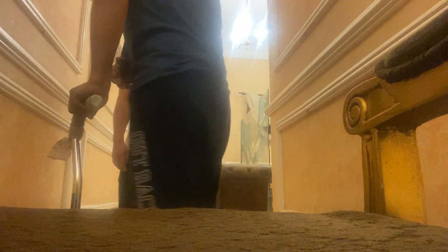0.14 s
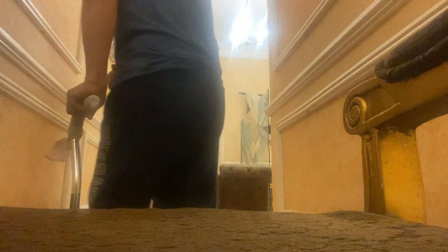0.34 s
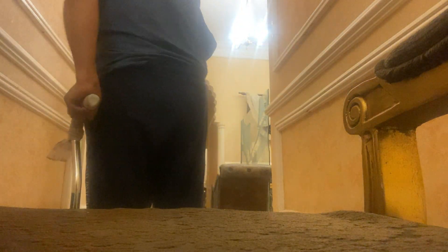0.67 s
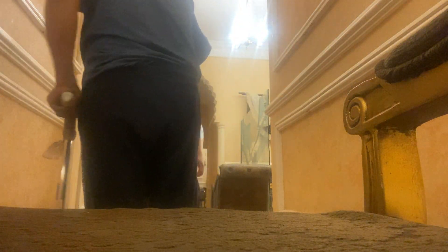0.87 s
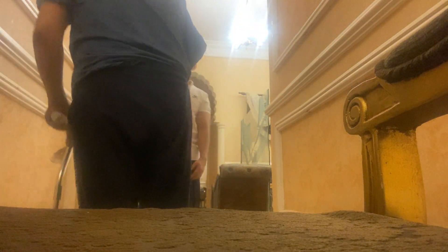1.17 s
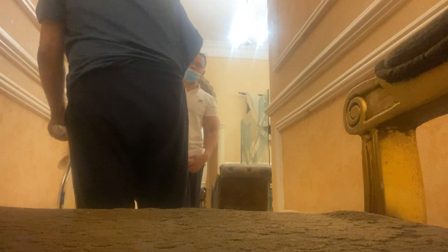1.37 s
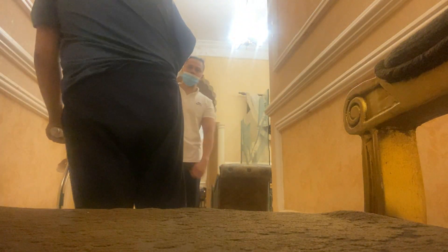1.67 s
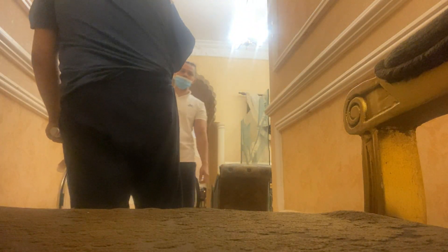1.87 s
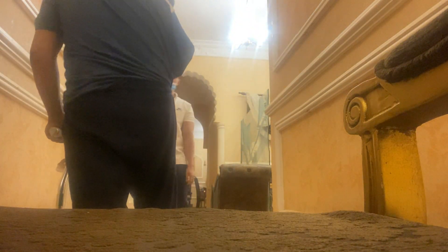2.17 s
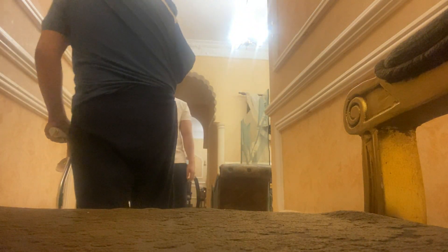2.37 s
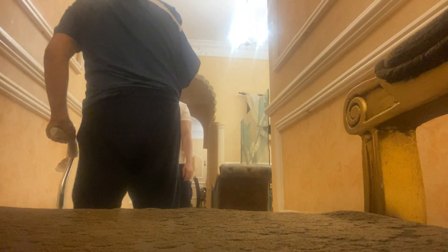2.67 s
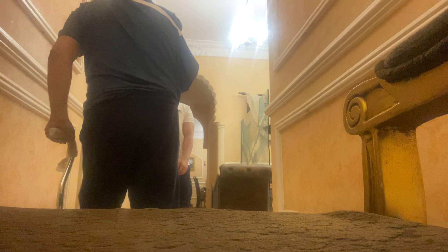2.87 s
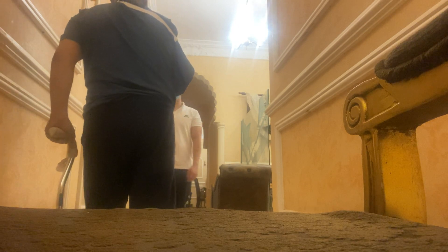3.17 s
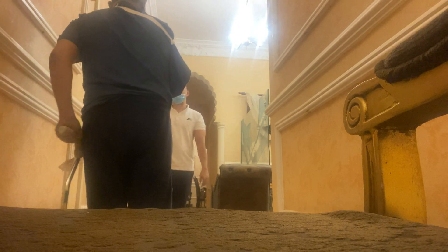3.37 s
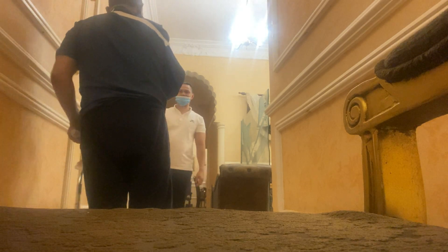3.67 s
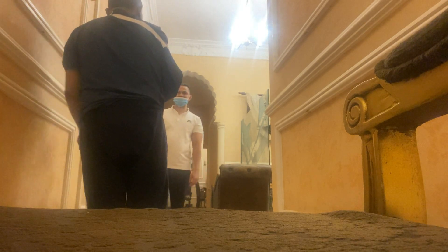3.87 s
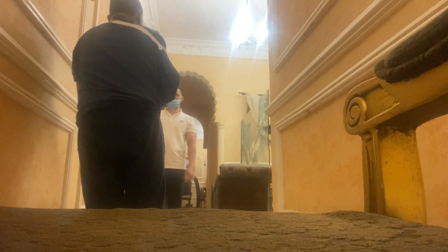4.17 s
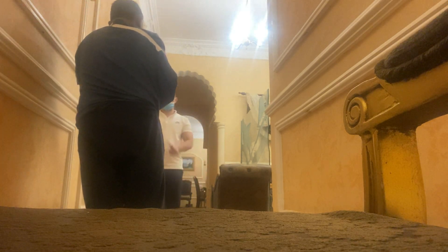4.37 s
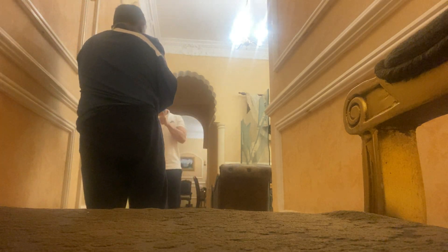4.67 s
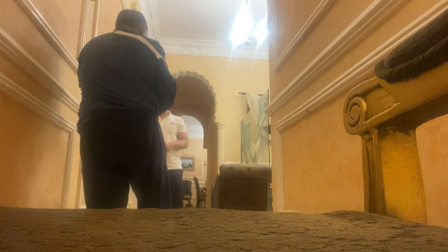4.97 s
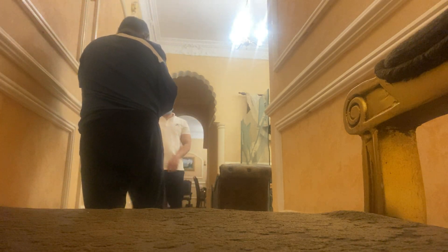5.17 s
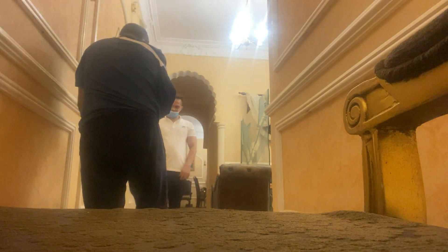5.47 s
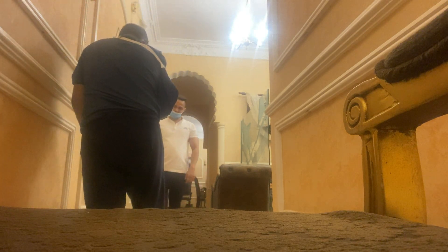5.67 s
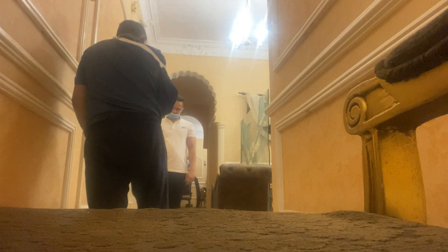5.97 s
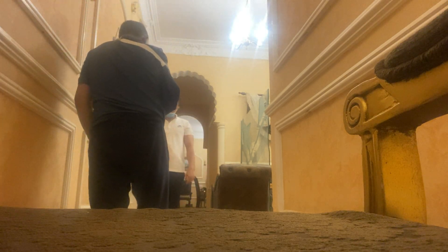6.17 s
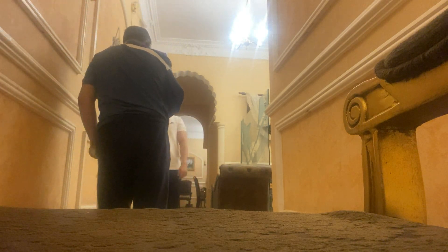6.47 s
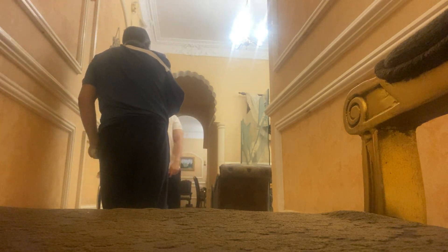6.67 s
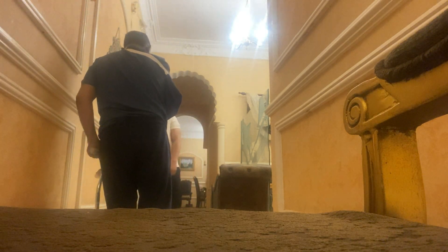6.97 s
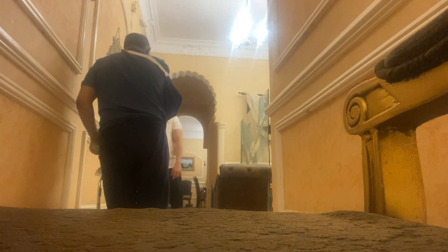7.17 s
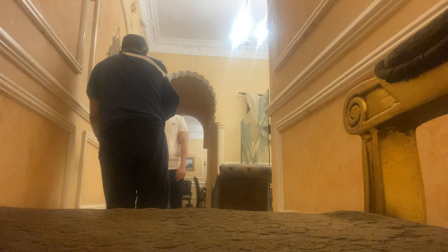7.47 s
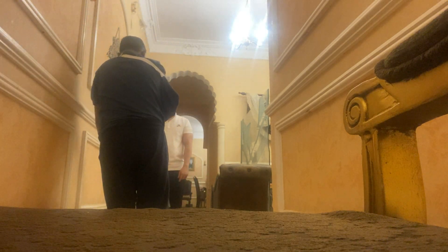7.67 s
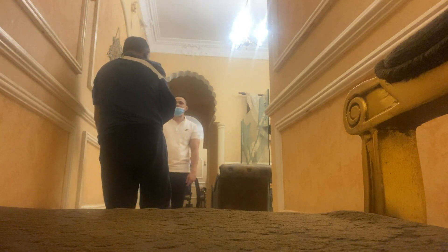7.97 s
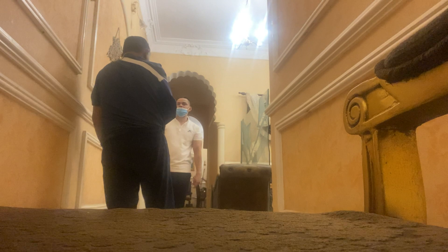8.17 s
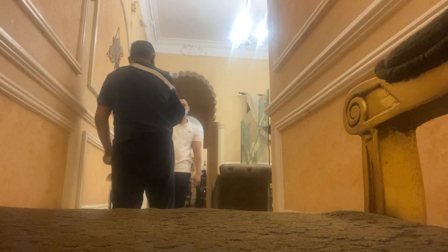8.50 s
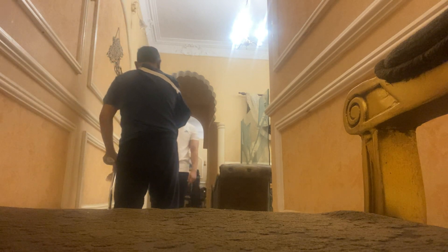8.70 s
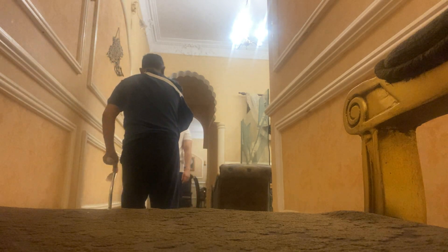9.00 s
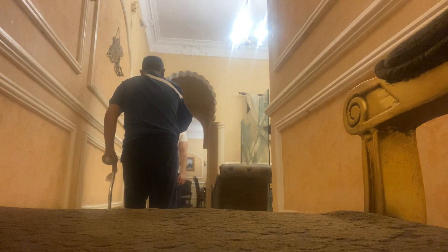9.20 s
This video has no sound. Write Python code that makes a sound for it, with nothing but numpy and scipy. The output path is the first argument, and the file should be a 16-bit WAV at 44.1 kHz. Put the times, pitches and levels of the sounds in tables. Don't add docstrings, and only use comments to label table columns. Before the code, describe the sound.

Slow shuffling steps and sparse cane taps recede along an echoing indoor corridor, beneath low throbbing motor drone and soft air hiss.

```python
import sys
import numpy as np
from scipy import signal
from scipy.fft import rfft, irfft, next_fast_len
from scipy.io import wavfile
from scipy.ndimage import map_coordinates

SR = 44100
rng = np.random.default_rng(int(sys.argv[2]) if len(sys.argv) > 2 else 0)


def gain_from_decibels(decibels):
    exponent = np.asarray(decibels, float) / 20
    return 10 ** exponent


def output_pcm(signal):
    pcm = np.clip(np.atleast_2d(signal).T, -1, 1) * 32767
    wavfile.write(sys.argv[1], SR, np.round(pcm).astype(np.int16))


N = 411894
LEAD = 9


def unit(x):
    return x / np.sqrt(np.mean(x ** 2) + 1e-20)


def along(points, hz):
    f, value = np.transpose(points)
    return np.interp(np.log(hz + 1), np.log(f + 1), value)


def wobble(rate):
    knots = rng.standard_normal(int(N * rate / SR) + 4)
    return map_coordinates(knots, [np.arange(N) * rate / SR])


def filtered(x, response):
    m = next_fast_len(N + SR // 2)
    return irfft(rfft(x, m) * response(np.fft.rfftfreq(m, 1 / SR)), m)[..., :N]


def band(x, lo_hz, hi_hz):
    return signal.sosfilt(signal.butter(2, [lo_hz, hi_hz], "band", fs=SR, output="sos"), x)


# (frequency [Hz], level [dB rms])
LEADING_MOTORS = [(57.168, -34), (116.047, -48.5)]
# (slip [Hz], level under the leader
# [dB], time both are in step [s])
SLIPS_LOW = [(.195, -5.7, 5.408), (.769, -9.1, 4.33), (.952, -7.6, 4.829), (1.912, -12.1, 4.377),
             (-1.921, -23.5, 4.847)]
SLIPS_HIGH = [(-1.707, -17.8, 4.837), (-1.326, -15.1, 4.757), (-1.066, -9.5, 4.138), (1.106, -9.8, 4.431),
              (2.127, -6.7, 4.772), (4.001, -2.5, 4.475)]


def beating_motors():
    t = np.arange(N) / SR
    drone = np.zeros(N)
    for (hz, db), slips in zip(LEADING_MOTORS, (SLIPS_LOW, SLIPS_HIGH)):
        group = np.cos(2 * np.pi * hz * t)
        for slip_hz, under_db, in_step_s in slips:
            group += gain_from_decibels(under_db) * np.cos(2 * np.pi * (hz * t + slip_hz * (t - in_step_s)))
        drone += np.sqrt(2) * gain_from_decibels(db) * group
    return drone


# (frequency [Hz], level [dB rms])
HUM_TONES = [(69.0, -47), (78.59, -52), (157.17, -62), (180.25, -50), (232.07, -65), (234.31, -63),
             (239.99, -57), (409.8, -64)]


def steady_hum():
    t = np.arange(N) / SR
    hum = np.zeros(N)
    for hz, db in HUM_TONES:
        drift = 2 * np.pi * rng.random() + 0.32 * wobble(1.2)
        level = np.sqrt(2) * gain_from_decibels(db + 0.19 * wobble(0.83))
        hum += level * np.sin(2 * np.pi * hz * t + drift)
    return hum


# (frequency [Hz], width [Hz], boost [dB])
DUCT_MODES = [(77, 1.2, 9.5), (87.3, 4.4, 9.5), (158.6, 5, 6.5), (173.5, 12, 6.5), (178, 120, 4),
              (284.8, 19.4, 9.5), (345, 46, 5.5), (420, 16, 9), (484.6, 15, 6.5), (771, 49, 4.5)]
# (frequency [Hz], level [dB per Hz])
RUMBLE_SHARED = [(25, -42), (40, -40.5), (50, -28.5), (62, -19.5), (95, -27), (105, -31.5), (135, -35.5),
                 (200, -36.5), (300, -37.5), (450, -38.5), (550, -42), (800, -47.5), (950, -55),
                 (1300, -100)]
# (frequency [Hz], level [dB per Hz])
RUMBLE_OPPOSED = [(15, -60), (25, -24), (44, -9), (65, -10.5), (92, -15.5), (162, -5.5), (205, -9.5),
                  (229, -9.5), (363, -15.5), (419, -7), (1100, -17.5), (1430, -47.5), (2420, -120)]
# (frequency [Hz], level [dB per Hz])
GRILLE_HISS = [(700, -32.5), (1000, 4.5), (1500, -2), (2000, -4.5), (2700, -7), (3100, -12.5),
               (4500, -17.5), (5500, -23.5), (8000, -33), (9500, -33.5), (12000, -29.5), (15000, -30.5)]


def duct_air():
    def ducts(f):
        return 1 + sum((gain_from_decibels(db) - 1) / (1 + (2 * (f - hz) / width) ** 2) for hz, width, db in DUCT_MODES)

    mid = filtered(rng.standard_normal(N), lambda f: gain_from_decibels(along(RUMBLE_SHARED, f) + 4.5) * ducts(f))
    side = filtered(rng.standard_normal(N), lambda f: gain_from_decibels(along(RUMBLE_OPPOSED, f) - 26) * ducts(f))
    hiss = filtered(rng.standard_normal((2, N)), lambda f: gain_from_decibels(along(GRILLE_HISS, f) - 53.5))
    hiss *= gain_from_decibels(0.5 * wobble(1.5) + 1.0 * wobble(9))
    mid = mid + hiss[0]
    side = side + gain_from_decibels(0.2) * hiss[1]
    swell = gain_from_decibels(0.6 * wobble(2.69))
    return swell * np.array([mid + side, mid - side])


def ventilation():
    tones = beating_motors() + steady_hum()
    return tones * gain_from_decibels([[-0.2], [0.2]]) + duct_air() * gain_from_decibels([[-0.4], [0.4]])


def friction(spectrum, alike, grain_db):
    flicker = gain_from_decibels(grain_db * (wobble(250) + wobble(45)))
    common, left, right = rng.standard_normal((3, N)) * flicker
    pair = np.sqrt(alike) * np.array([common, np.roll(common, LEAD)])
    pair += np.sqrt(1 - alike) * np.array([left, right])
    return unit(filtered(pair, lambda f: gain_from_decibels(along(spectrum, f))))


# (middle [s], length [s], rustle [dB], fine rustle [dB])
BRUSHES = [(.15, .4, -78, -77), (0.546, 0.59, -71.5, -74.5), (.78, 0.27, -79, -79), (1.04, 0.19, -80, -89),
           (1.42, 0.33, -74.5, -80), (1.83, 0.23, -78, -79), (2.046, 0.5, -76, -85), (2.32, 0.18, -84, -79),
           (2.706, .3, -89, -83), (3.218, .35, -84, -93), (3.7, 0.14, -81, -75), (3.9, .4, -86, -81),
           (4.715, 0.53, -73, -78), (5.174, 0.22, -82, -77), (5.796, 0.31, -93, -94),
           (6.617, 0.37, -81, -81), (7.504, 0.24, -95, -89), (8.03, 0.5, -85, -77), (8.435, 0.17, -83, -78),
           (8.618, 0.4, -87, -88)]
# (rustle [dB], fine rustle [dB])
CLOTH_REST = [-89.5, -92.5]
# (time [s], rise [s], rub [dB], grit [dB], fine dust [dB])
SCUFFS = [(.32, .028, -59, -71, -81), (.352, 0.05, -50, -66.5, -75.5), (.72, 0.007, -68, -72, -83.5),
          (.82, 0.033, -61.5, -73, -72.5), (1.444, 0.047, -51, -61.5, -70.5), (2.49, 0.05, -61, -84, -85),
          (3.31, .0088, -56, -68, -74), (3.511, 0.024, -59.5, -85, -90), (3.69, 0.043, -56, -72, -76.5),
          (4.099, 0.018, -51, -63, -70), (4.335, 0.017, -57.5, -77, -75), (5.94, .006, -55, -56.5, -63.5),
          (5.97, 0.03, -50, -62, -75), (6.97, 0.078, -63.5, -83, -89.5), (7.63, 0.021, -57, -65.5, -77),
          (7.805, .0084, -65, -85, -76), (9.255, .01, -60, -65.5, -81)]
# (frequency [Hz], level [dB per Hz])
RUB = [(500, -24), (900, -1.5), (1400, -4), (2100, -1), (2500, 0.5), (2900, -7), (5000, -19.5), (9000, -54)]
# (frequency [Hz], level [dB per Hz])
GRIT = [(2500, -20), (4000, 1), (6000, 2), (8000, -1), (10000, -5), (11500, -25)]
# (frequency [Hz], level [dB per Hz])
DUST = [(6500, -25), (8500, -8), (10300, -1.5), (13000, 1), (15500, -1.5)]


def cloth_and_soles():
    t = np.arange(N) / SR
    power = np.zeros((3, N))
    for s, rise, *levels_db in SCUFFS:
        u = np.clip(t - s, 0, None)
        fall = 0.39 + 6 * rise
        swell = np.sin(np.pi / 2 * np.clip(u / rise, 0, 1)) ** 2
        shape = swell * gain_from_decibels(-60 * np.clip(u - rise, 0, None) / fall)
        power += (gain_from_decibels(levels_db)[:, None] * shape) ** 2
    power[1:] += gain_from_decibels(CLOTH_REST)[:, None] ** 2
    for s, length, *levels_db in BRUSHES:
        swing = np.cos(np.pi * np.clip((t - s) / length, -0.5, 0.5))
        power[1:] += (gain_from_decibels(levels_db)[:, None] * swing) ** 2
    rub, grit, dust = np.sqrt(power)
    sound = rub * friction(RUB, alike=0.2, grain_db=0.9)
    sound += grit * friction(GRIT, alike=0.1, grain_db=1.0)
    return sound + gain_from_decibels(4.5) * dust * friction(DUST, alike=0.05, grain_db=1.2)


# (time [s], peak [dB], slap [dB], top [dB], hallway tail [dB])
KNOCKS = [
    (0.3166, -60.5, 9, -25, -2),
    (1.1929, -42, 9.5, -15.5, -3.5),
    (1.9833, -37, 1, -31, -3.5),
    (3.2862, -49.5, 12.5, -8, -4.5),
    (4.5457, -44.5, 3, -26.5, -2.5),
    (5.4589, -61, 12, -8.5, 5.5),
    (5.9398, -47, -12, -14.5, 3.5),
    (7.85, -78, 16, -14, -6),
    (9.252, -48.5, 1, -31, -2),
]
# (time [s], peak [dB], slap [dB], tube
# rattle [dB], top [dB])
RATTLES = [(0.8682, -58, 10, -10, -10), (0.902, -58.5, -2, -4.5, -20), (1.3668, -57.5, 9.5, -4.5, -16),
           (3.3189, -55, -1, -7.5, -22), (3.6894, -65, 2, -4, -11), (3.966, -62.5, 5, -5, -13),
           (4.089, -52.5, 2.5, -7, -20), (4.115, -42.5, -5, -6, -23), (4.1454, -46, -1, -5, -20),
           (4.353, -62.5, 11, -5, -19), (5.7146, -63.5, 9.5, -0.5, -15), (7.6223, -53, 7, -1, -12),
           (7.6645, -56.5, -3, -3, -26.5), (7.761, -53.5, -12, -4.5, -27), (9.0446, -63.5, -16, -3.5, -7)]


def contacts():
    held_rattle_db, rattle_tail_db, tail_grows_db_per_s = -13.5, -3.5, 0.42
    knocks = [(s, db, slap, held_rattle_db, top, tail) for s, db, slap, top, tail in KNOCKS]
    rattles = [(*row, rattle_tail_db + tail_grows_db_per_s * row[0]) for row in RATTLES]
    return knocks + rattles


def ringing(modes, t):
    return sum(gain_from_decibels(db + rng.normal(0, 2.4) - 60 * t / t60) * np.sin(2 * np.pi * hz * t)
               for hz, db, t60 in modes)


# (frequency [Hz], t60 [s])
HALL_DECAY = [(1000, 0.19), (3000, 0.65), (8000, 0.34), (14000, .3)]


def hall(colour):
    hz, t, z = signal.stft(rng.standard_normal((2, SR // 2)), SR, nperseg=128)
    scatter = gain_from_decibels(-60 * t / 0.074)
    late = gain_from_decibels(-5.5 - 60 * t / along(HALL_DECAY, hz)[:, None])
    tint = (colour(hz) * (hz > 900))[:, None]
    tail = signal.istft(z * tint * (scatter + late), SR, nperseg=128)[1]
    return tail * np.clip(np.arange(tail.shape[1]) / SR / 0.009, 0, 1) ** 2


# (frequency [Hz], level [dB], t60 [s])
SHAFT_MODES = [(1860, -3.5, 0.011), (2570, -5, 0.018), (3340, -2, 0.011), (4800, -10, 0.011),
               (5700, -8.5, 0.0099)]
# (frequency [Hz], level [dB], t60 [s])
TUBE_MODES = [(6950, -11, 0.074), (7430, 9.5, 0.04), (8040, 6.5, 0.03), (8160, -19, .03)]
BURST_T60 = np.array([[.035], [.035], [.04]])
# (delay [s], level [dB])
WALL_ECHOES = [(0.01, 3.5), (0.012, -22), (.021, -13), (.028, -14.5)]


def cane_taps():
    out = np.zeros((2, N + SR))
    t = np.arange(SR // 8) / SR
    for s, db, slap_db, ring_db, top_db, tail_db in contacts():
        puff = rng.standard_normal((3, len(t))) * gain_from_decibels(-60 * t / BURST_T60)
        crack = 1.08 * band(puff[0], 1600, 8600)
        top = 4 * gain_from_decibels(top_db) * band(puff[2], 13000, 15800)
        slap = gain_from_decibels(slap_db) * (0.82 * band(puff[1], 730, 3470) + 0.39 * ringing(SHAFT_MODES, t))
        rattle = gain_from_decibels(1.4 * ring_db - 6)
        ring = rattle * ringing(TUBE_MODES, t)
        hit = crack + top + ring

        back = (slap + 0.42 * crack + 0.22 * ring + 0.15 * top) * gain_from_decibels(-60 * t / 0.03)
        echo = sum(gain_from_decibels(echo_db) * np.roll(back, round(delay * SR)) for delay, echo_db in WALL_ECHOES)

        def colour(f):
            low = gain_from_decibels(slap_db) / (1 + (f / 3000) ** 4)
            middle = 0.47 * (f > 2800) * (f < 10300)
            high = 2.6 * gain_from_decibels(top_db) * (f > 10300)
            tube = 3 * rattle / (1 + ((f - 7500) / 300) ** 2)
            return low + middle + high + tube

        sound = gain_from_decibels(tail_db + 2.5) * hall(colour)
        direct = np.array([hit, np.roll(hit, LEAD)])
        direct += 0.85 * np.array([np.roll(slap, LEAD // 3), slap])
        sound[:, :len(t)] += direct + echo
        out[:, round(s * SR):][:, :sound.shape[1]] += gain_from_decibels(db) * sound * gain_from_decibels([[-0.6], [0.6]])
    return out[:, :N]


# (time [s], level [dB], pitch [Hz], length [s])
THUDS = [
    (5.693, -38.5, 424, 0.051),
    (5.69, -38.5, 528, 0.035),
    (5.7, -37.5, 138.4, 0.12),
    (7.005, -61.5, 1326, 0.068),
    (7.033, -62, 1424, 0.058),
    (7.072, -64, 1380, .1),
]


def floor_thuds():
    t = np.arange(N) / SR
    out = np.zeros(N)
    for s, db, hz, length in THUDS:
        u = np.clip((t - s) / length, 0, 1)
        out += gain_from_decibels(db) * np.sin(np.pi * u) * np.sin(2 * np.pi * hz * (t - s))
    return out


def scene():
    return ventilation() + cloth_and_soles() + cane_taps() + floor_thuds()


def low_pass(x):
    return signal.sosfilt(signal.butter(12, 15750, fs=SR, output="sos"), x)


# (frequency [Hz], share [0..1])
SHARED_TREBLE = [(4500, 0), (6000, .08), (6500, .35), (7000, .88), (16000, .93)]
# (frequency [Hz], level [dB])
PORT_RESPONSE = [(9000, 1), (11300, -2.5), (15300, -4.5), (15900, -28.5)]


def record(dry):
    in_step_hz, turn_hz = 7900, 5130

    def late(hz):
        return np.sqrt(along(SHARED_TREBLE, hz)) * np.exp(-2j * np.pi * (hz - in_step_hz) / turn_hz)

    own = filtered(dry[1], lambda hz: np.sqrt(1 - along(SHARED_TREBLE, hz)))
    right = filtered(dry[0], late) + own
    mix = filtered(np.array([dry[0], right]), lambda hz: gain_from_decibels(along(PORT_RESPONSE, hz)))
    return low_pass(mix)


dry = scene()
out = record(dry)
output_pcm(out)
```